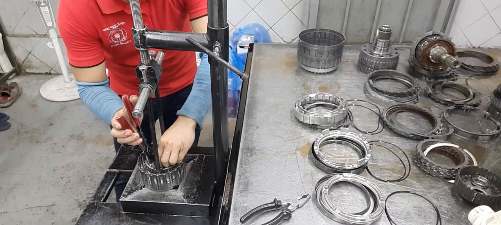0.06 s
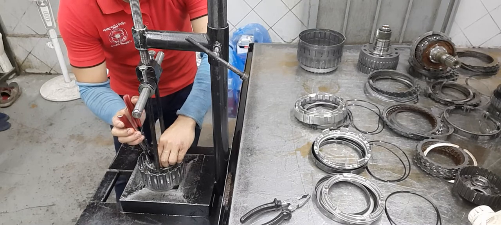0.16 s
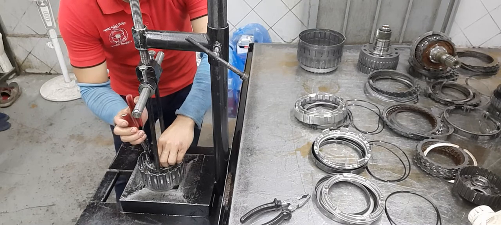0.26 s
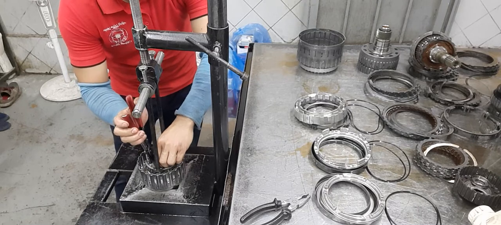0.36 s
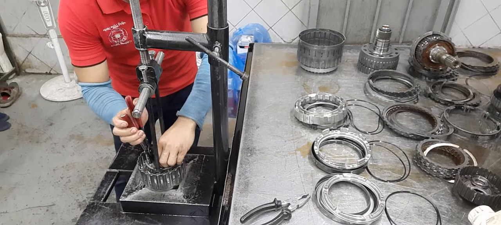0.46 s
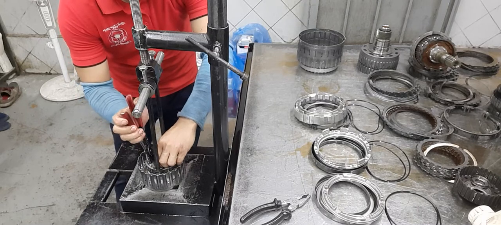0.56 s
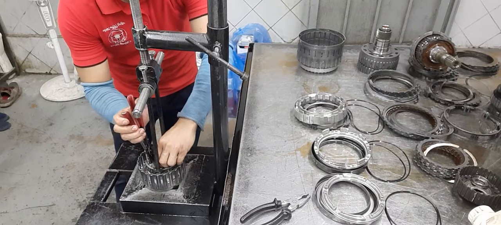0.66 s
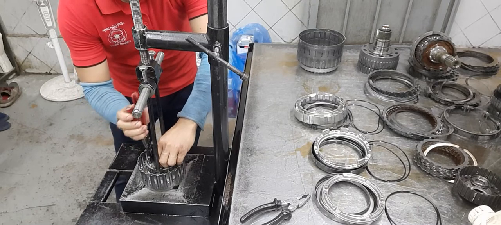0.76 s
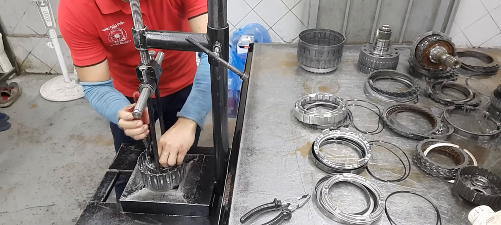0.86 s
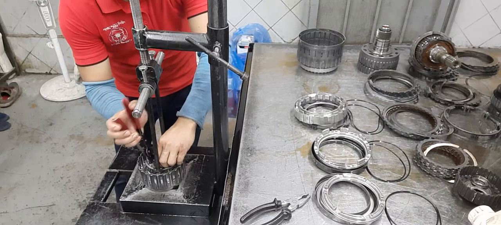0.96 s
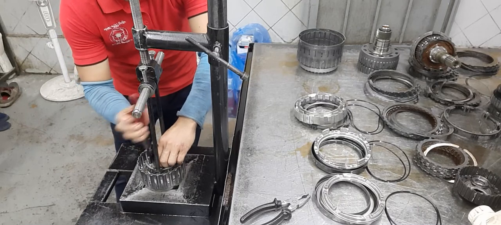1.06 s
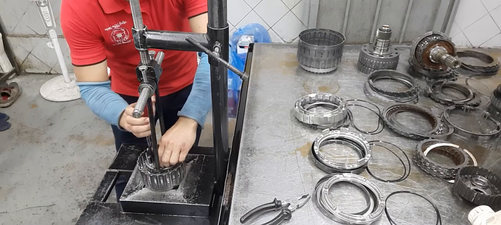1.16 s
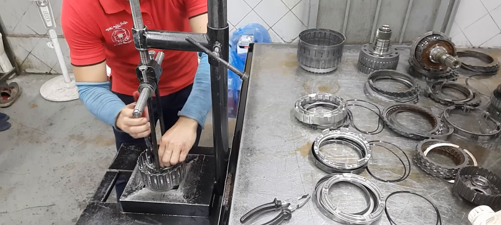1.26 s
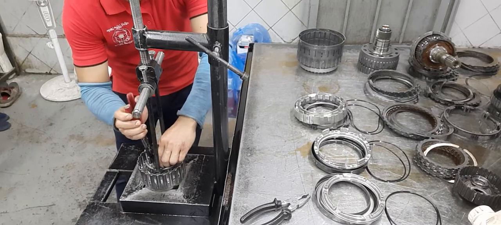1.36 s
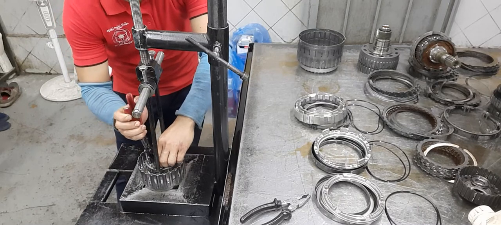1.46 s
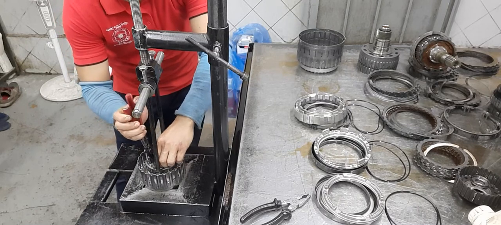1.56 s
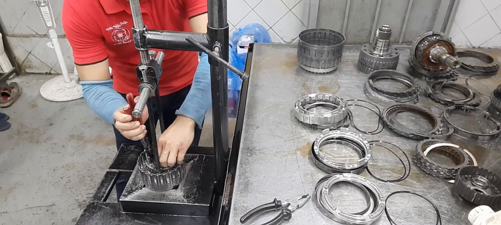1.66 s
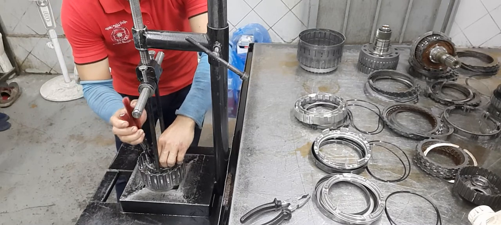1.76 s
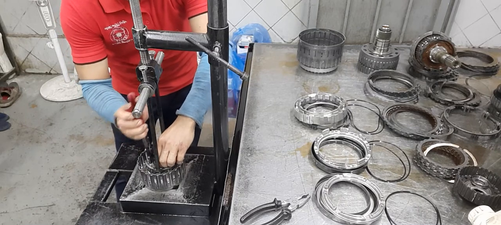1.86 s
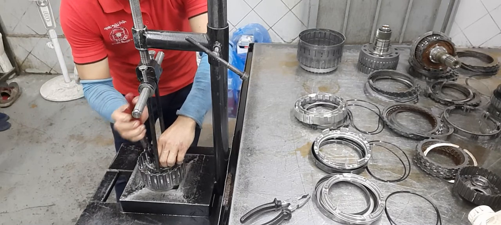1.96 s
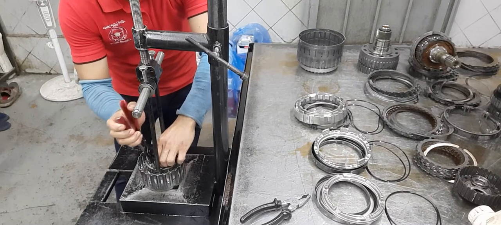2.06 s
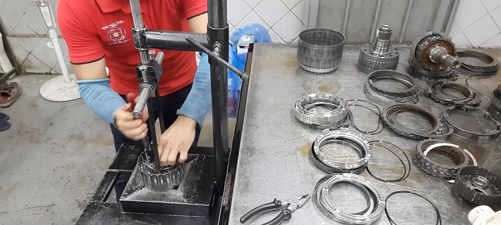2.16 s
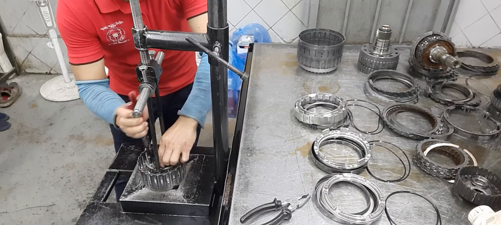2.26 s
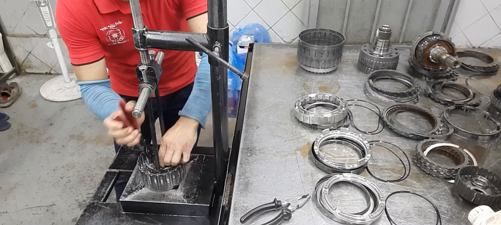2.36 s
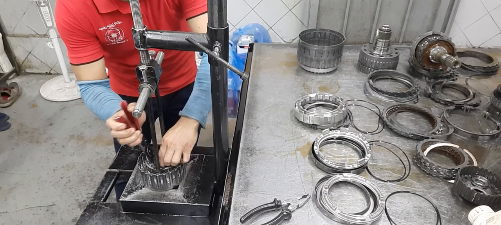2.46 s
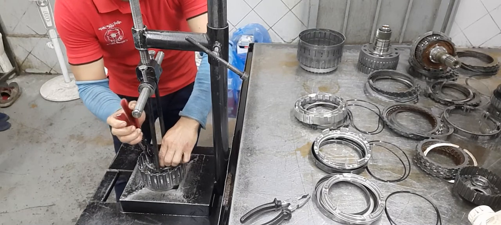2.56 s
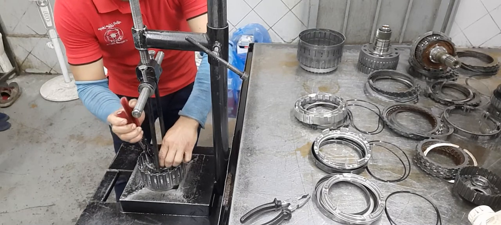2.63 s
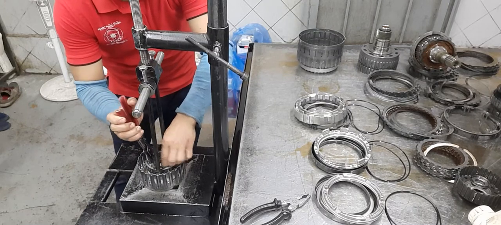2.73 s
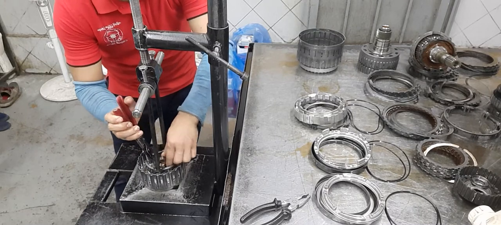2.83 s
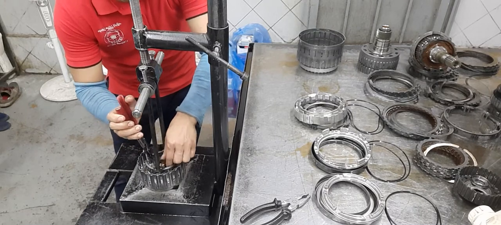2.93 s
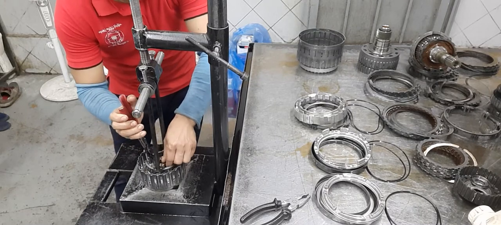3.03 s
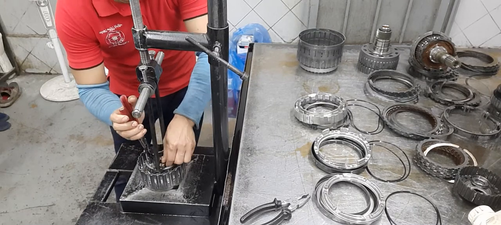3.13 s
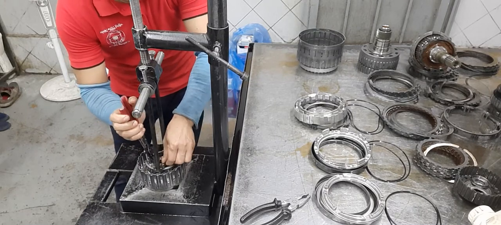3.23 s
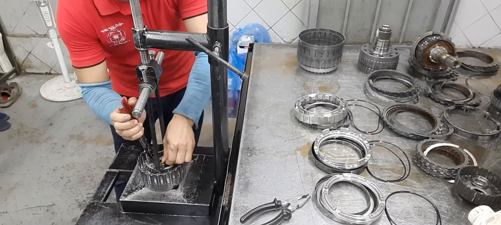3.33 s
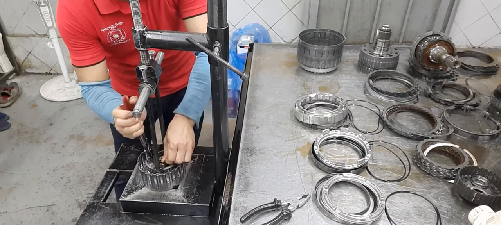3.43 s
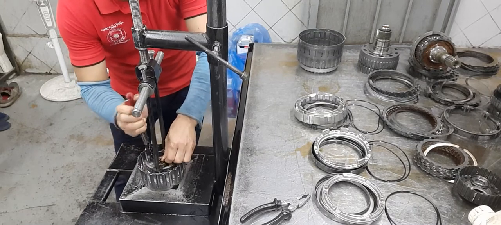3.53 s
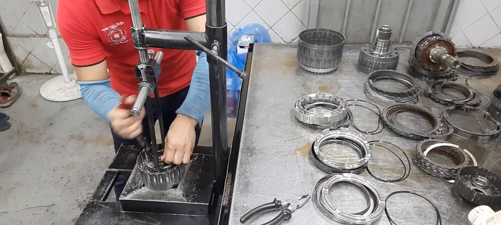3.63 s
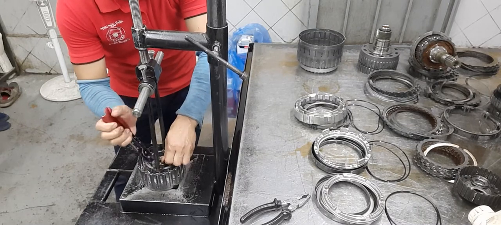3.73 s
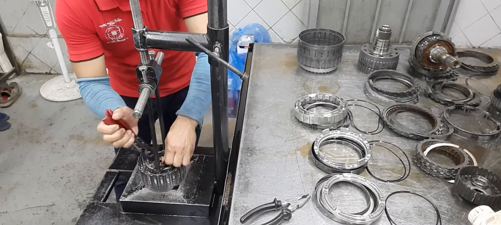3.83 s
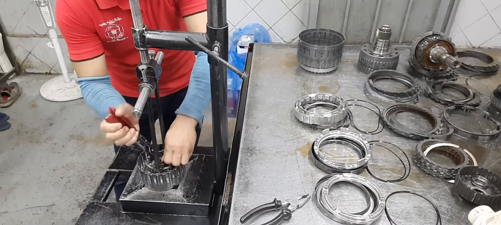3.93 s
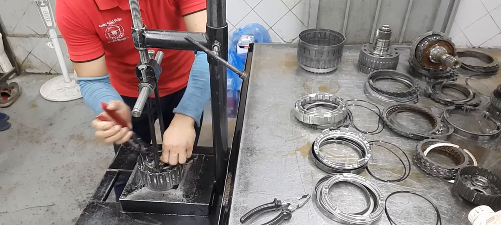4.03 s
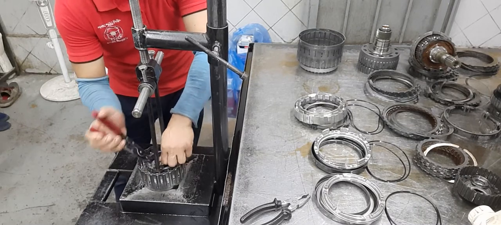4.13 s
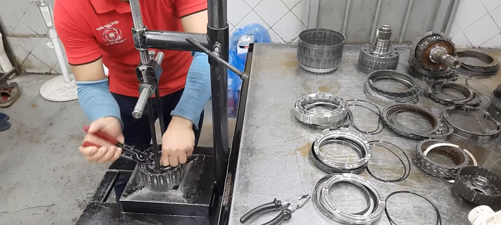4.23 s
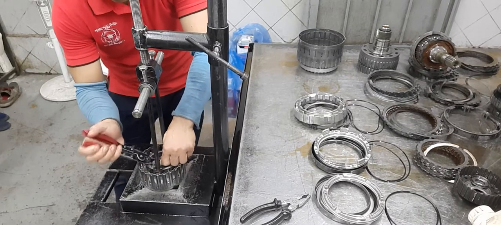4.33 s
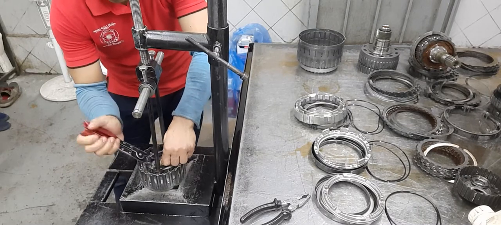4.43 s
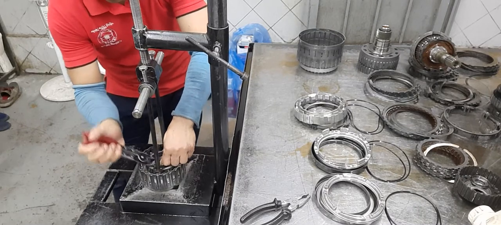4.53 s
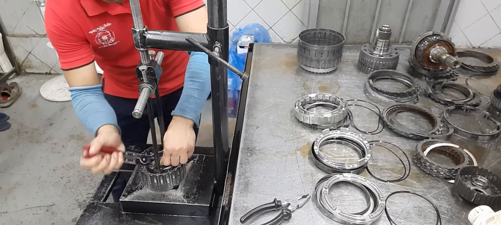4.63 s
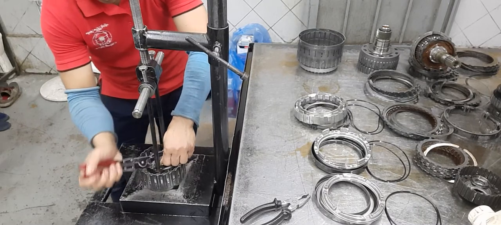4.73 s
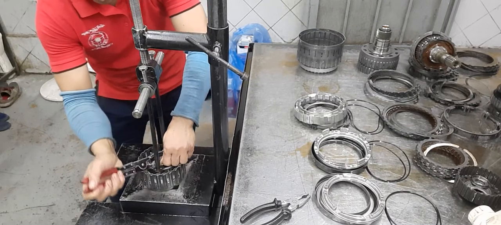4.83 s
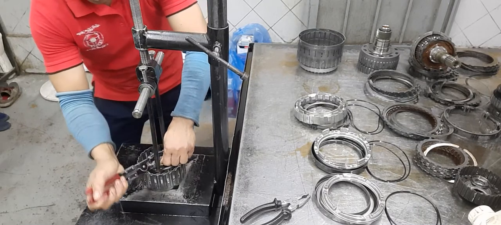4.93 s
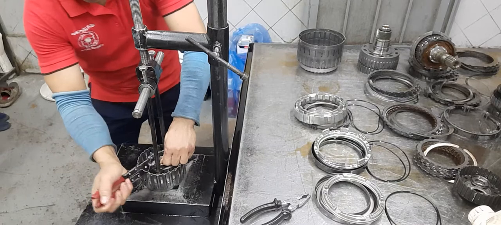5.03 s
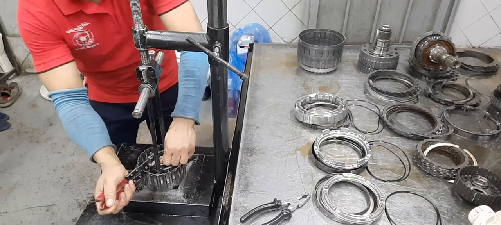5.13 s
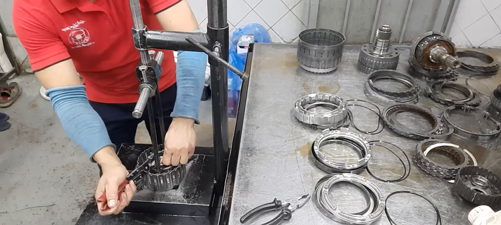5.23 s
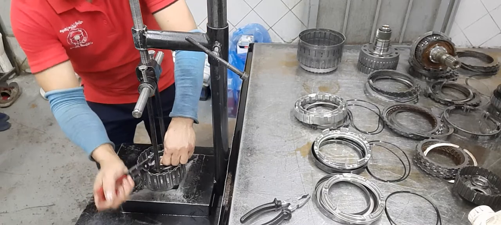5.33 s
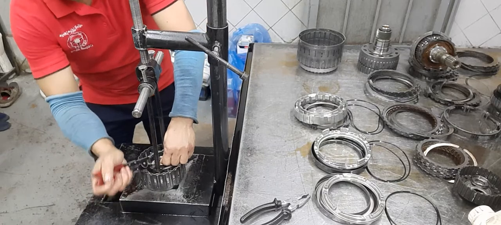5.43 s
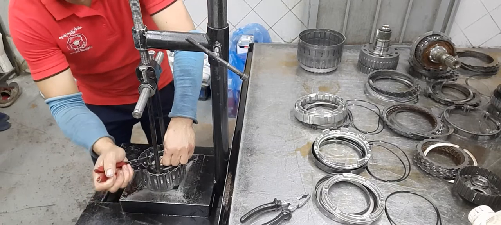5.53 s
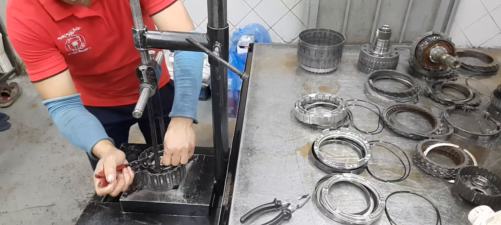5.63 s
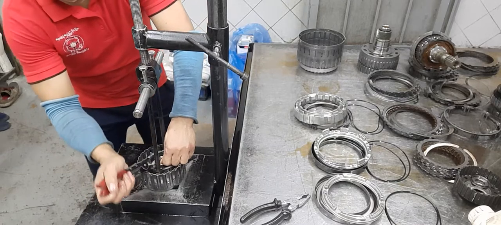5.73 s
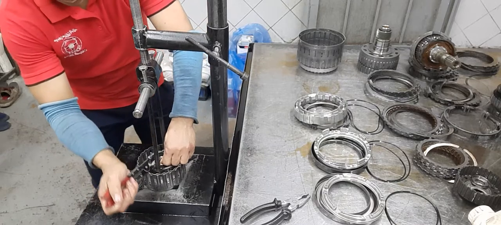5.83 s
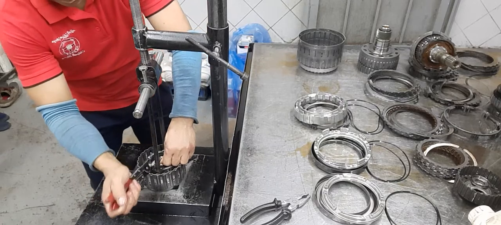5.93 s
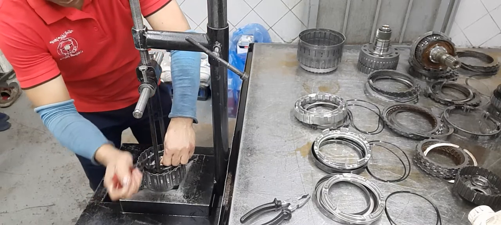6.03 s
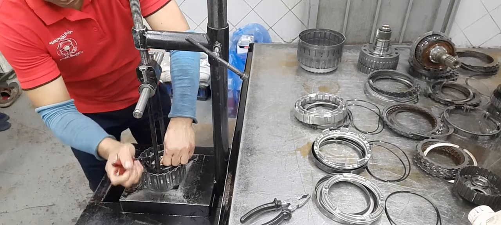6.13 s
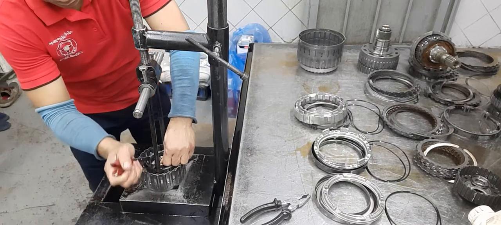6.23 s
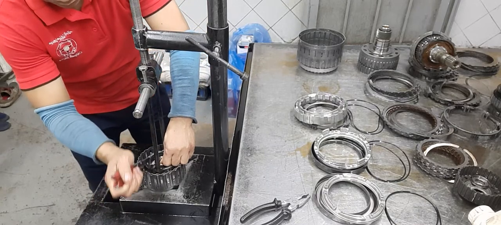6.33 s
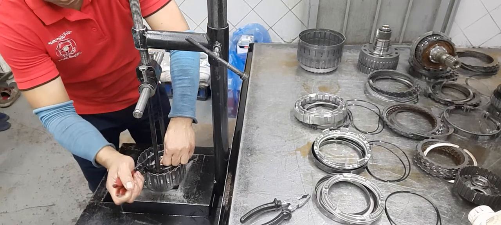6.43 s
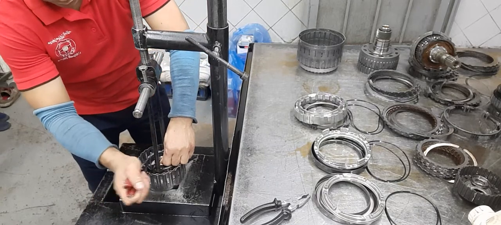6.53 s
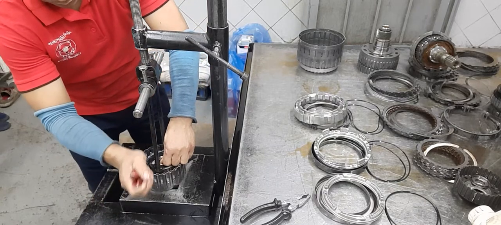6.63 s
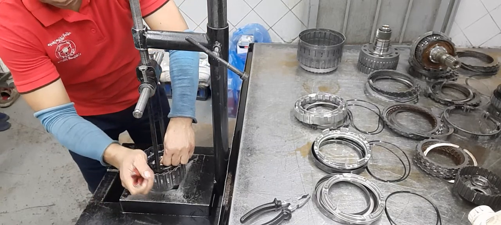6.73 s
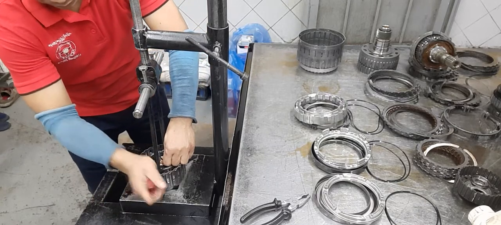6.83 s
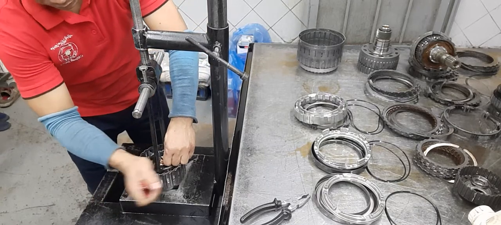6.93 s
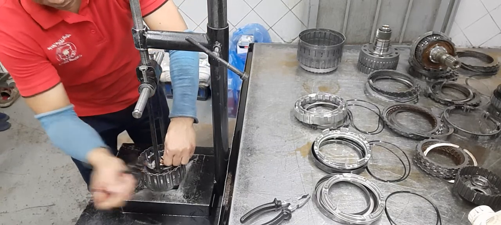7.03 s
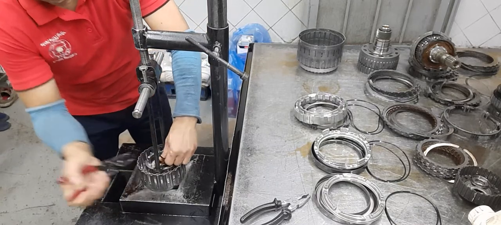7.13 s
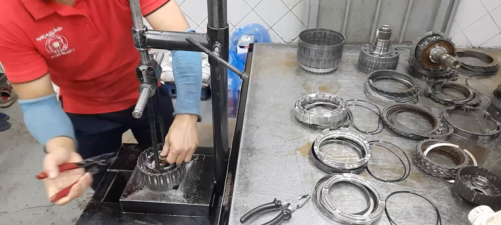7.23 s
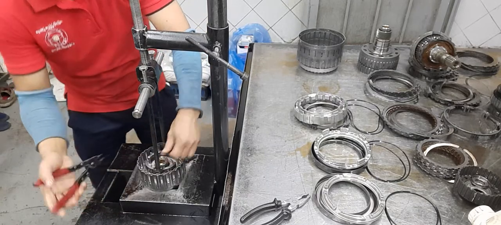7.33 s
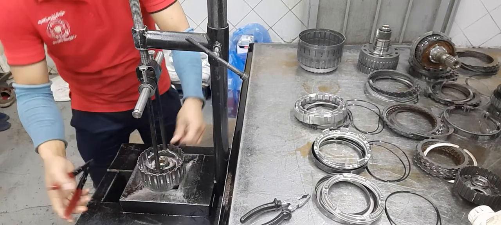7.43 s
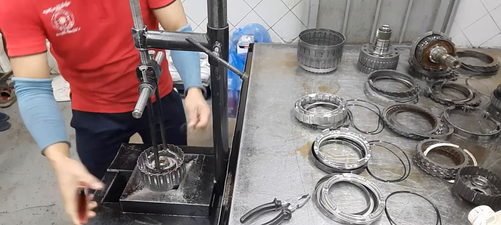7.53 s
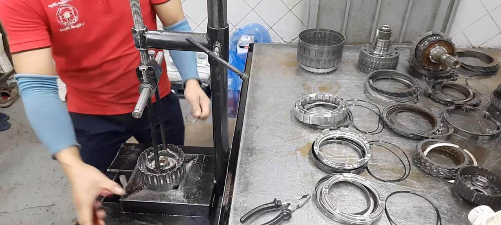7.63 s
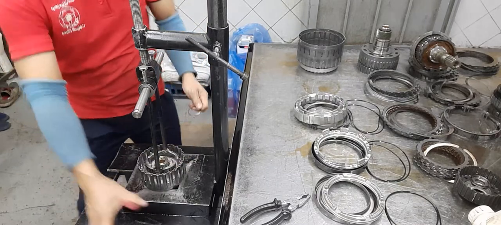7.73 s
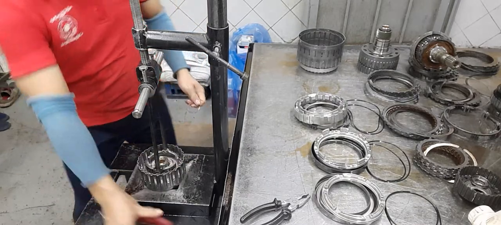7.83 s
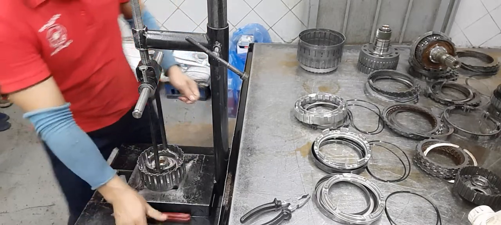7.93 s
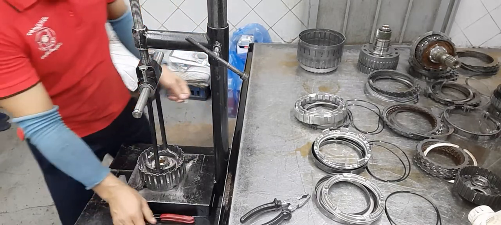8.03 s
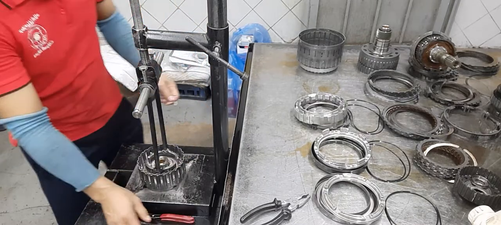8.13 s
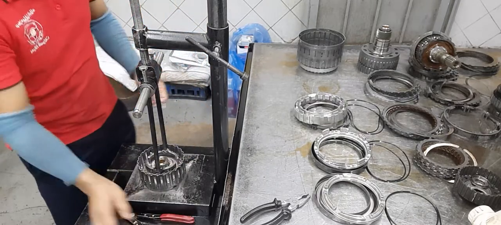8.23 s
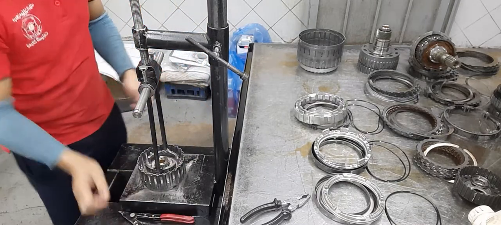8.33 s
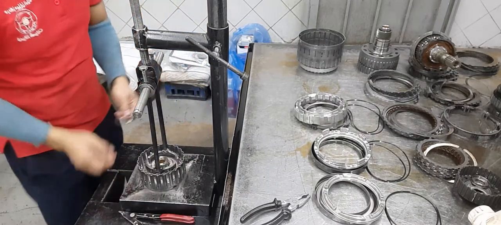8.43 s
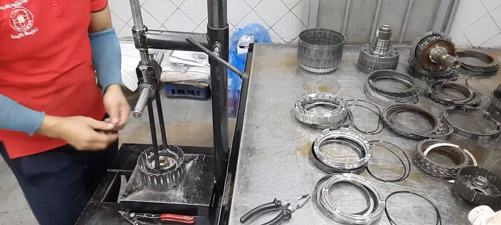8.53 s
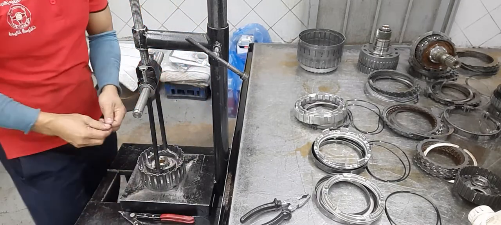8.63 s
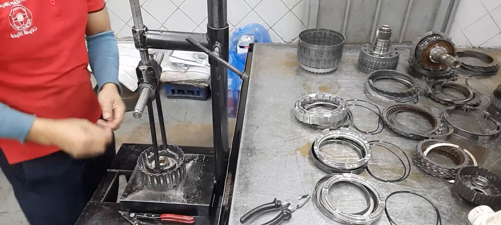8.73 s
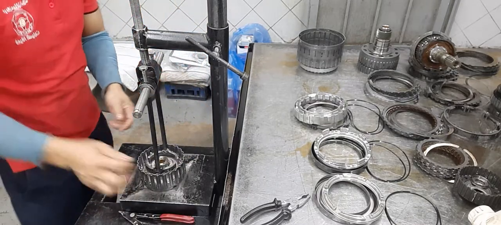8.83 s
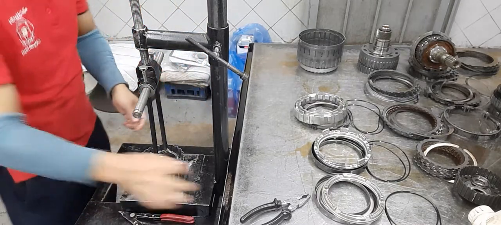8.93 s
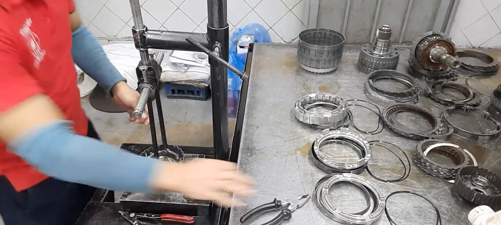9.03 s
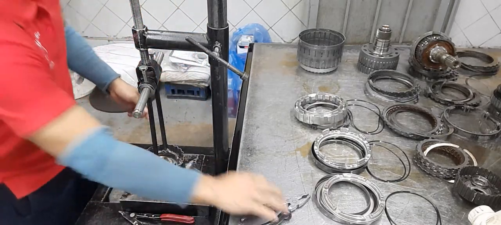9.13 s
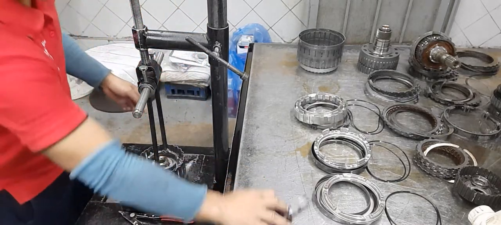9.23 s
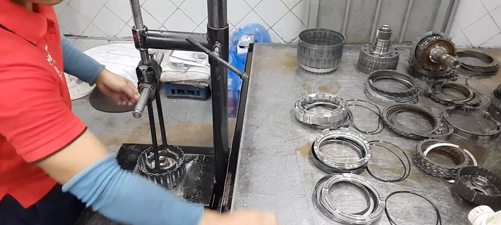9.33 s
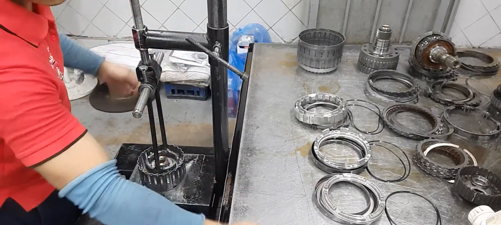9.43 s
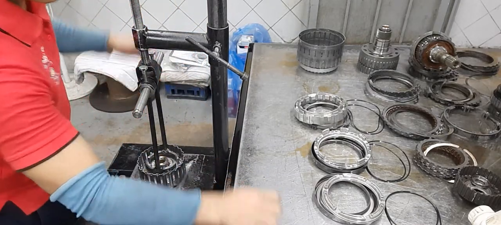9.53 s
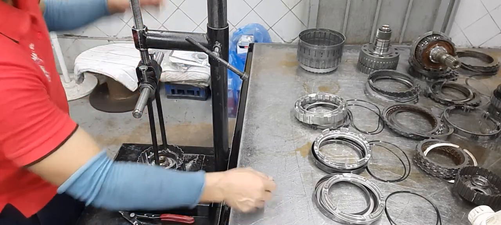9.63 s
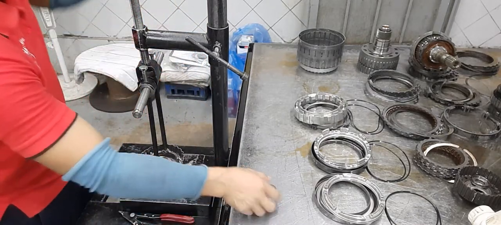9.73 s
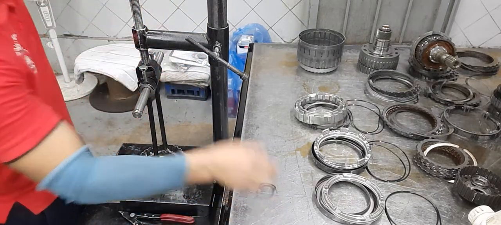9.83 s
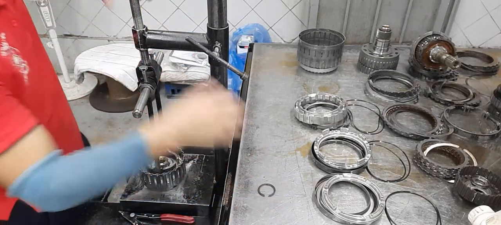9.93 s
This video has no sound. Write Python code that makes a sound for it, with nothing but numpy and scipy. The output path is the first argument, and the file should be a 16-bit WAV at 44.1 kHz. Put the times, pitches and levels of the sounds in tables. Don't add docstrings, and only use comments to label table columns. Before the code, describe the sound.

A low, slightly fluttering fan hum fills a hard-walled workshop, heard by a close stereo phone. The first second is nearly bare; faint metal touches come at 1.1 s. At 2.05 and 2.4 s plier tips click sharply, while a faint horn toots far off. Snaps crack at 3.2 and 3.7-3.8 s with short pings and hollow base booms. From 4.2 to 5.9 s come levering knocks, a small scrape and faint squeal near 4.5 s, a firmer thump at 5.4 s, and faint traffic swells. Taps at 6.6 s lead to a hard snap at 6.8 s and a booming bang at 6.87 s. Shoes twist, then pliers clatter onto a ringing steel plate at 7.9 s with a low jolt; the hum dips. Soles scuff around 8.2 s. From 9.2 s the hum recovers as a ring clanks, slides across steel and rattles down with bright ringing by 9.9 s.

```python
import sys
import numpy as np
from scipy import signal
from scipy.fft import rfft, irfft
from scipy.io import wavfile
from scipy.ndimage import uniform_filter1d

SR = 44100
rng = np.random.default_rng(int(sys.argv[2]) if len(sys.argv) > 2 else 0)


def digitize_waveform(pressure):
    field = np.atleast_2d(pressure).T
    bounded = np.clip(field, -1, 1)
    quanta = np.round(bounded * 32767).astype(np.int16)
    wavfile.write(sys.argv[1], SR, quanta)


def gain_from_db(level_db):
    decades = np.asarray(level_db, float) / 20
    return 10 ** decades


N = 439677
T = np.arange(N) / SR


def along(table, hz):
    table_hz, value = np.transpose(table)
    return np.interp(np.log(np.maximum(hz, 1)), np.log(table_hz), value)


def colour(x, table, scale=1):
    hz = np.fft.rfftfreq(x.shape[-1], 1 / SR)
    return irfft(rfft(x) * gain_from_db(scale * along(table, hz)), x.shape[-1])


def band(x, lo_hz, hi_hz):
    edges_hz = [lo_hz, min(hi_hz, SR / 2.1)]
    return signal.sosfilt(signal.butter(2, edges_hz, "band", fs=SR, output="sos"), x)


def steep(x, lo_hz, hi_hz):
    once = band(x, 0.9 * lo_hz, 0.94 * hi_hz)
    return band(once, 0.9 * lo_hz, 0.94 * hi_hz)


def unit(x):
    return x / np.sqrt(np.mean(x ** 2))


def walk(rate_hz):
    k = int(SR / rate_hz)
    steps = np.repeat(rng.standard_normal(N // k + 1), k)
    return unit(uniform_filter1d(uniform_filter1d(steps, k), k)[:N])


def ring(hz, t60_s, t):
    return np.sin(2 * np.pi * hz * t) * np.exp(-np.log(1000) * t / t60_s)


def add(out, start_s, x):
    i = int(start_s * SR)
    out[i:i + len(x)] += x[:N - i]


# hz, share [-1 to 1]
LIKENESS = [(60, 1), (130, 0.9), (290, 0.95), (640, 0.3), (1410, -0.16), (3100, 0.17), (6820, -0.25),
            (15000, 0.29)]


def diffuse(count):
    share = np.clip(along(LIKENESS, np.fft.rfftfreq(count, 1 / SR)), -0.9, 0.94)
    mid, side = rfft(rng.standard_normal((2, count)))
    mid = mid * np.sqrt((1 + share) / 2)
    side = side * np.sqrt((1 - share) / 2)
    return irfft(np.array([mid + side, mid - side]), count)


# start_s, crack_db, clank_db (rel), sizzle_db (rel)
TAPS = [(2.0504, -32.5, -20, 2.5), (2.3135, -49, 1, -3.5), (2.379, -35, 2.5, 3), (2.8446, -53, 1, 4),
        (3.7155, -45, -3, 3), (4.2266, -46, -2.5, -6), (6.5889, -45.5, 8, -5), (9.4964, -34, -5, -4.5)]
# start_s, crack_db, clank_db (rel), sizzle_db (rel)
SNAPS = [(3.2388, -24, -5, 2), (3.2486, -31, -5, 7.5), (3.7213, -22.5, -8, 1), (3.8003, -27.5, -6, -4.5),
         (4.1993, -48, -14.5, -5), (6.8087, -16.5, -5.5, 4), (6.9797, -36, -3, -12), (6.9985, -54, 0, -1)]
# start_s, crack_db, clank_db (rel), sizzle_db (rel)
PRIES = [(1.0927, -58, 11, -23), (1.1223, -46.5, -12, -18), (2.739, -60, -5, -22),
         (4.2476, -38.5, -5.5, -9.5), (4.403, -55, -5, -16), (4.474, -55, -3, -5), (4.5124, -47.5, -4, -16),
         (4.6014, -42.5, 3.5, -4), (4.9374, -51, 13, -21), (5.0287, -40, -0.5, -17),
         (5.3992, -30.5, -4, -16), (5.7913, -50.5, 16, -17), (5.8844, -39.5, 8, -12)]
# start_s, crack_db, clank_db (rel), sizzle_db (rel)
KNOCKS = [
    (6.8691, -21, -0.1, -24),
]
# start_s, crack_db, clank_db (rel), sizzle_db (rel)
CLATTER = [
    (7.8154, -52, -6, -6.5),
    (7.879, -15, -12, 1.5),
    (7.891, -16, -1.5, -5),
    (7.9148, -12, -5.5, -5),
    (7.9589, -12.5, -6, -25),
]
# start_s, crack_db, clank_db (rel), sizzle_db (rel)
LAYS = [(9.17, -30, -5.5, -4), (9.2286, -28, -11, -13.5), (9.2423, -26, -3.5, -2), (9.4783, -29, 4.5, -19),
        (9.488, -31.5, -17, 0.5), (9.508, -48, -11.5, -5), (9.521, -27.5, -10, 3.8),
        (9.754, -23, -13.5, -8), (9.8375, -31, -8, -11), (9.8969, -30.5, -8, 1)]
# table, snap_db (rel), reflected_db, drum_ring_db, push_s
KINDS = [
    (TAPS, 4.3, -2, -2, .0001),
    (SNAPS, -2.5, 0.55, 0, .0001),
    (PRIES, -3, -1.85, 0.78, 0.00067),
    (KNOCKS, -19, -4.5, 1, .004),
    (CLATTER, -5, 0.79, -4.5, .0001),
    (LAYS, -6.5, -2.1, -4.5, 0.00033),
]


def all_contacts():
    snap_per_sizzle = 0.12
    found = []
    for rows, snap_db, *rest in KINDS:
        for start_s, crack_db, clank_db, sizzle_db in rows:
            lifted_db = snap_db + snap_per_sizzle * sizzle_db
            found.append((start_s, crack_db, clank_db, lifted_db, sizzle_db, *rest))
    return sorted(found)


# hz, level_db (over the crack), t60_s
DRUM = [(864, 2, 0.059), (1070, 9, 0.065), (1660, -0.5, 0.068), (1823, 3, 0.046), (2336, 4, 0.053),
        (2770, 0.5, 0.043), (6320, 4, 0.01), (8270, 1, 0.0024), (11230, 3.5, 0.0062), (14200, 5, .003)]


def drum(ring_db, t):
    spread_db = 3.5
    response = 1.0 * (t == 0)
    for hz, level_db, t60_s in DRUM:
        level = gain_from_db(ring_db + level_db + spread_db * rng.standard_normal())
        per_sample = 2 * np.log(1000) / (t60_s * SR)
        response += level * per_sample * ring(hz, t60_s, t)
    return response


CRACK_FADES = .004, .0018, .0014, .0012
CRACK_PEAKS = 0, 4, 8, 7.5


def contacts():
    spots = 3
    near, far, t = np.zeros(N), np.zeros((spots, N)), np.arange(2048) / SR
    click = 1.0 * (np.arange(256) == 128)
    for k, (start_s, db, clank_db, snap_db, sizzle_db, wet_db, ring_db, push_s) in enumerate(all_contacts()):
        push = 1 - np.exp(-t / push_s)
        ranges = (600, 2000, clank_db), (2000, 4500, 0), (4500, 9000, snap_db), (9000, 17000, sizzle_db)
        for (lo_hz, hi_hz, rel_db), fade_s, peak_db in zip(ranges, CRACK_FADES, CRACK_PEAKS):
            grain = unit(steep(rng.standard_normal(len(t)), lo_hz, hi_hz))
            add(near, start_s, gain_from_db(db + rel_db + peak_db) * grain * np.exp(-t / fade_s) * push)
        spectrum = [(250, clank_db - 11.0), (800, clank_db + 3.5), (1900, clank_db + 7.5),
                    (3000, 0.0032), (4000, 0.00056), (5500, snap_db - 1), (8500, snap_db + 0.5),
                    (10500, sizzle_db - 3.0), (16000, sizzle_db - 9.5)]
        blow = signal.fftconvolve(colour(click, spectrum), drum(ring_db, t))
        add(far[k % spots], start_s - 128 / SR, gain_from_db(db + wet_db + 21.5) * blow)
    return near, far


# start_s, level_db (middle pair), third_db (rel), lowest_db (rel), freedom [0-1]
RING_HITS = [
    (9.756, -32.5, -3, -13, 0.44),
    (9.796, -44.5, 12.5, -3, .5),
    (9.84, -38.5, -9, -6, 0.65),
    (9.889, -32.5, -10, -32, 0.7),
    (9.9, -23.5, -19, -32, 0.12),
]
HELD_HITS = [
    (3.722, -33, -16, -30, .07),
    (3.801, -44, 5, -30, .07),
    (6.808, -24, -16, -30, .05),
]
# hz, t60_s
RING = [
    ((10850, .2), (11010, .6)),
    ((13650, 0.83), (13930, .9)),
    ((8263, 0.9),),
    ((6060, 4.2), (5600, 0.44)),
]


def snap_ring():
    out, t = np.zeros(N), np.arange(SR // 2) / SR
    for hits, top_db in ((RING_HITS, -5), (HELD_HITS, -19)):
        for start_s, db, third_db, low_db, freedom in hits:
            for group, rel_db in zip(RING, (0, top_db, third_db, low_db)):
                for hz, t60_s in group:
                    mode = ring(hz, t60_s * np.clip(freedom, 0.03, 2), t)
                    add(out, start_s, gain_from_db(db + rel_db - 4.0) * mode)
    return out


# start_s, level_db, pitch_hz
PINGS = [(2.378, -23.5, 1795), (3.801, -18, 2530), (4.247, -41, 2280), (4.404, -40.5, 2334),
         (4.938, -43.5, 2400), (5.028, -32, 2320), (5.793, -47, 2280), (5.883, -29, 2450),
         (6.587, -36.5, 2250), (6.868, -15.5, 1103), (6.872, -20, 1745), (9.171, -22, 2140),
         (9.229, -27, 4650), (9.242, -19.5, 3840), (9.497, -19.5, 7300), (9.521, -21, 3360)]


def pings():
    out, t = np.zeros(N), np.arange(4000) / SR
    for start_s, db, hz in PINGS:
        cluster = sum(ring(hz * (1 + 0.01 * d), 0.03, t) for d in rng.standard_normal(3))
        add(out, start_s, gain_from_db(db - 13.0) * cluster)
    return out


# start_s, level_db, pitch_hz
SQUEAL = [
    (4.381, -75, 3520),
    (4.41, -64, 3460),
    (4.502, -63, 3710),
    (4.533, -46, 3850),
    (4.6, -69, 4060),
    (4.68, -75, 3930),
]


def squeal():
    start_s, db, hz = np.transpose(SQUEAL)
    phase = 2 * np.pi * np.cumsum(np.interp(T, start_s, hz)) / SR
    slips = rng.standard_normal(N) * gain_from_db(3.7 * rng.exponential(size=N))
    rough = unit(uniform_filter1d(slips, size=70))
    level = gain_from_db(np.interp(T, start_s, db, left=-120, right=-120) - 3)
    return level * rough * np.sin(phase)


def struck(hits, modes, spread_db, rise_s):
    out, t = np.zeros(N), np.arange(SR // 2) / SR
    rise = 1 - np.exp(-t / rise_s)
    for start_s, db in hits:
        for hz, mode_db, t60_s in modes:
            level_chance, pitch_chance = rng.standard_normal(2)
            mode = ring(hz * (1 + 0.0085 * pitch_chance), t60_s, t)
            add(out, start_s, gain_from_db(db + mode_db + spread_db * level_chance) * mode * rise)
    return out


# start_s, level_db
DROP_HITS = [
    (7.879, -8),
    (7.8909, -6.5),
    (7.9124, -9.5),
    (7.9562, -14),
]
# hz, level_db, t60_s
PLATE = [(485.2, -1.6, .25), (576.5, -2.1, 0.17), (1060, -5.5, 0.18), (1129, -6.5, 0.21), (1188, -3.5, 0.2),
         (1213, -2, 0.1), (1192.6, -2, .15), (1340, 0.5, 0.1), (1830, -10.5, .1), (2630, -17, 0.083),
         (3021, -9.5, 0.34), (3076, -1, 0.37), (3410, -7.5, 0.15), (4590, -11.5, .15)]


def plate():
    return gain_from_db(-20.5) * struck(DROP_HITS, PLATE, spread_db=5.5, rise_s=0.0056)


# start_s, level_db
THUDS = [(2.102, -34), (2.379, -35.5), (3.069, -42.5), (3.249, -47.5), (3.288, -26.5), (3.72, -21),
         (3.8, -27.5), (4.248, -24.5), (4.574, -29.5), (4.603, -21), (4.636, -32.5), (4.936, -26.5),
         (5.026, -26.5), (5.398, -18.5), (5.792, -27.5), (5.883, -29.5), (6.588, -28), (6.809, -20),
         (6.866, -11.5), (6.988, -26), (7.891, -17.5), (7.928, -15), (9.243, -31), (9.478, -38)]
# hz, level_db, t60_s
BASE = [(334.1, 0.5, 0.13), (377.2, -5.5, 0.21), (1090, -7, 0.12)]


def press_base():
    return 1.72 * gain_from_db(-12.5) * struck(THUDS, BASE, spread_db=3.5, rise_s=0.006)


def jolt():
    out, t = np.zeros(N), np.arange(4000) / SR
    add(out, 7.892, gain_from_db(-21) * ring(76, 0.06, t))
    return out


# start_s, hold_s, level_db, rumble_db (rel)
SCUFFS = [
    (1.1, .04, -62.5, 7),
    (8.13, 0.012, -43.5, -5.5),
    (8.2, 0.087, -43, -10.5),
    (8.55, 0.024, -59, -4),
    (8.82, .03, -58, 3),
]
TURNS = [
    (7.58, .05, -49, -6),
    (7.768, .03, -43, -8),
    (7.82, .05, -48, -6),
]
SCRAPES = [
    (4.33, 0.026, -52, 3),
    (4.41, .012, -60, -8),
    (4.536, 0.072, -47, 5),
]
SLIDES = [
    (9.2, 0.037, -37, -6),
    (9.25, 0.022, -50.5, 13),
    (9.3, .11, -32, -4),
    (9.49, .03, -42.5, 5),
    (9.58, 0.11, -56.5, 18.5),
]
CHATTER = [
    (9.78, .02, -44.5, 1),
    (9.846, .012, -40.5, -19),
    (9.9, .08, -42.5, -22),
]
# table, hiss_db (rel), rise_db_per_s, fall_db_per_s
STROKES = [
    (SCUFFS, -5.5, 300, 420),
    (TURNS, -19, 900, 330),
    (SCRAPES, -14, 840, 480),
    (SLIDES, -10.5, 480, 266),
    (CHATTER, 2.5, 700, 880),
]


def rubs():
    grains = rng.standard_normal((3, N)) * gain_from_db(0.58 * rng.exponential(size=N)) * gain_from_db(3.7 * walk(40))
    body = unit(band(grains[0], 1100, 5500))
    rumble = unit(band(grains[1], 110, 600))
    hiss = unit(band(grains[2], 6000, 13000))
    out = np.zeros(N)
    for rows, hiss_db, rise, fall in STROKES:
        for start_s, hold_s, db, rumble_db in rows:
            shape_db = -rise * np.maximum(start_s - T, 0) - fall * np.maximum(T - start_s - hold_s, 0)
            texture = body + gain_from_db(rumble_db) * rumble + gain_from_db(hiss_db) * hiss
            out += gain_from_db(db - 11.0 + shape_db) * texture
    return out


# multiple, level_db
HORN = [(1, -5), (2, -0.5), (3, -3.5), (4, -11), (5, -12), (6, -13), (7, -20), (8, -28)]


def horn():
    start_s, end_s, pitch_hz, level_db = 2.09, 2.36, 411, -66.5
    gate = np.clip(np.minimum(T - start_s, end_s - T) / 0.019, 0, 1)
    phase = 2 * np.pi * np.cumsum(pitch_hz * (1 + 0.0031 * walk(21.94))) / SR
    tone = sum(gain_from_db(db + 2.6 * walk(25.24)) * np.sin(k * phase + k * k) for k, db in HORN)
    return gate * gain_from_db(level_db) * tone


# start_s (centre), length_s, level_db
SWELLS = [
    (3.85, 0.16, -48),
    (4.3, 0.33, -56),
    (5.7, .25, -54.5),
    (6.091, 0.17, -54.5),
]


def traffic():
    rumble = unit(band(rng.standard_normal(N), 40, 170))
    return rumble * sum(gain_from_db(db) * np.exp(-((T - s) / length_s) ** 2) for s, length_s, db in SWELLS)


# hz, level_db (per Hz)
HUM = [(18, -35.5), (30, -17), (70, -3.5), (141, -8), (210, -15.5), (336, -8), (499, -17.5), (649, -17),
       (780, -21.5), (1070, -20.5), (2060, -32.5), (3310, -41), (4530, -47), (6050, -49), (16000, -73.5)]
# hz, width_hz, level_db
HUM_PEAKS = [(58.4, 14, -48.5), (84.3, 3.4, -56.5), (335.4, 25, -57.5), (382, 14, -60), (1046, 180, -61.5),
             (6280, 1300, -74.5), (3240, 800, -74)]
# start_s, step_db, lag_s
GAIN_STEPS = [
    (.1, 1, .3),
    (6.9, -2, .4),
    (7.9, -8, .3),
    (9.22, 9.5, .09),
]


def hum():
    out = gain_from_db(-46 - 4.5) * unit(colour(diffuse(N), HUM)) * gain_from_db(0.83 * walk(4.1))
    for hz, width_hz, db in HUM_PEAKS:
        resonance = unit(band(diffuse(N), hz - width_hz / 2, hz + width_hz / 2))
        out += gain_from_db(db + 1.2 * walk(3.6)) * resonance
    out += gain_from_db(-81) * rng.standard_normal(out.shape)
    gain_db = sum(db * (1 - np.exp(-np.maximum(T - s, 0) / lag_s)) for s, db, lag_s in GAIN_STEPS)
    return out * gain_from_db(gain_db)


# hz, t60_s
ROOM_T60 = [(200, 0.42), (1000, 0.54), (4000, 0.47), (8000, 0.32), (15000, 0.32)]


def room(x, wet_db):
    t = np.arange(SR // 2) / SR
    noise, tail = rfft(diffuse(len(t))), 0
    octave = np.log2(np.maximum(np.fft.rfftfreq(len(t), 1 / SR), 1))
    for hz in 125 * 2 ** np.arange(8):
        weight = np.clip(1 - abs(octave - np.log2(hz)), 0, 1)
        decay = np.exp(-np.log(1000) * t / along(ROOM_T60, hz))
        tail = tail + irfft(noise * weight, len(t)) * decay
    knee_s = 0.29
    tail = tail * np.clip((t - 0.003) / 0.0034, 0, 1) * np.exp(-(t / knee_s) ** 2)
    tail = tail / np.sqrt(np.mean(np.sum(tail ** 2, axis=1)))
    return gain_from_db(wet_db) * signal.fftconvolve(x[None], tail, axes=1)[:, :N]


def scene():
    bodies = plate() + rubs() + squeal()
    tones = snap_ring() + pings() + press_base()
    near, far = contacts()
    direct = near + bodies + tones
    lag = 7
    ports = np.array([direct, 0.56 * np.roll(direct, lag)])
    walls = room(bodies + 0.5 * tones + 3 * horn(), wet_db=2) + sum(room(x, wet_db=5.0) for x in far)
    return ports + walls + hum() + jolt() + traffic()


# hz, level_db
MIC = [(25, -22), (45, -3), (330, 4), (700, 1), (6000, 0), (8700, 1.5), (9400, -1.5), (10200, 1),
       (15000, 2)]
# hz, level_db
TOP = [(15500, 0), (15900, -12), (16900, -24), (17100, -60)]
# hz, level_db
LEFT_DB = [(60, 0), (110, 2), (200, 2), (380, 1.5), (700, 4.5), (1290, 2), (2380, 5), (4400, 1), (8120, 1),
           (15000, 6)]


def phone_ports(dry):
    left, right = colour(colour(dry, MIC), TOP)
    return np.array([colour(left, LEFT_DB, scale=0.5), colour(right, LEFT_DB, scale=-0.5)])


def top_cut(x):
    return signal.sosfilt(signal.butter(12, 17060, fs=SR, output="sos"), x)


def record(dry):
    mix = np.tanh(phone_ports(dry))
    return top_cut(mix)


dry = scene()
out = record(dry)
digitize_waveform(out)
```